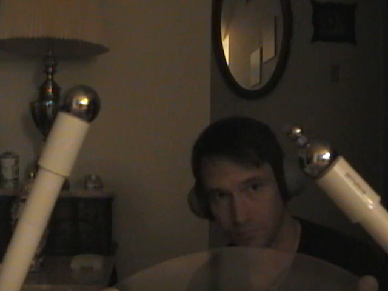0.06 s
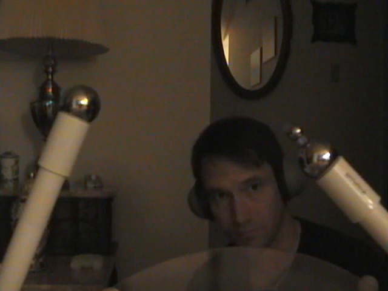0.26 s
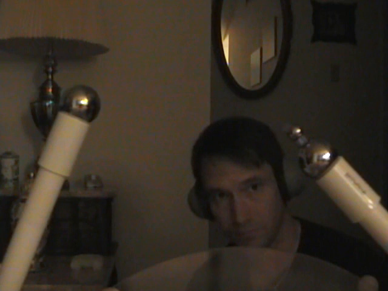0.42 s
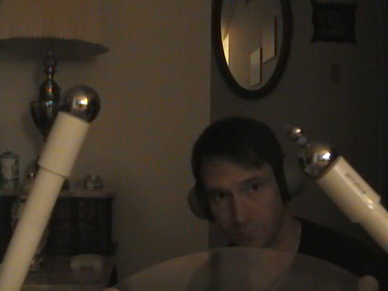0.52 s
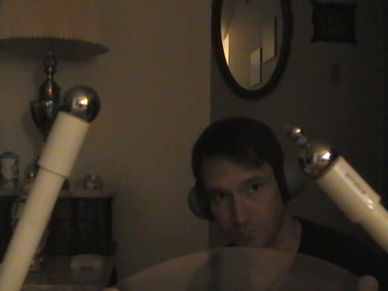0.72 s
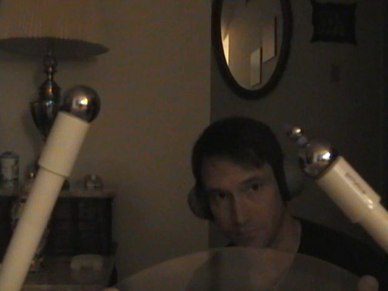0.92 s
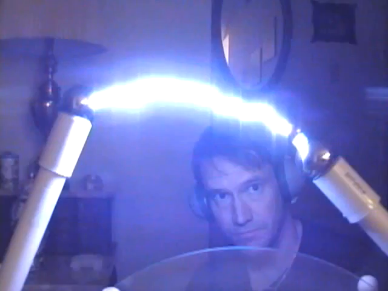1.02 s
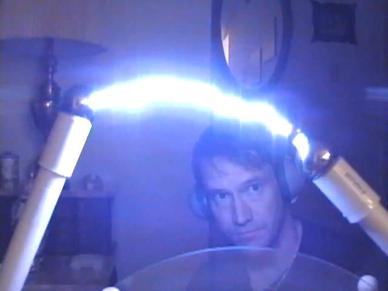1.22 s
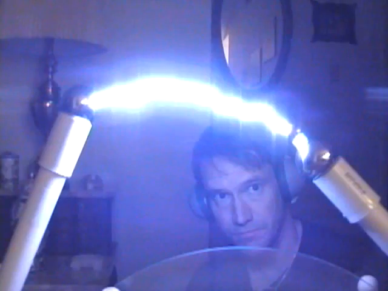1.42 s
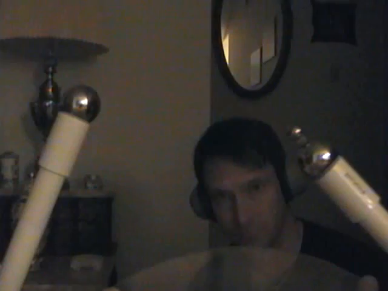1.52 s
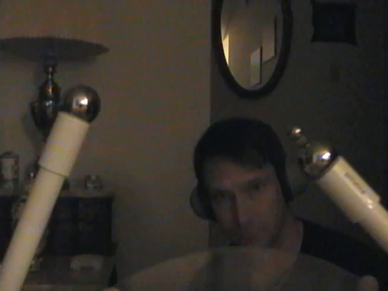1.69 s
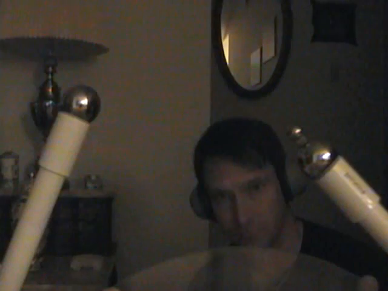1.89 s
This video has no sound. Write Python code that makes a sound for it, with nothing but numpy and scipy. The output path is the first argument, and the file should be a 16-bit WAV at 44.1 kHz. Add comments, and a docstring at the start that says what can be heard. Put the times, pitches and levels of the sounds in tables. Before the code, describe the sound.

A high-voltage spark jumps between electrodes with one very loud, sharp crack that overloads the microphone. Before it come electric sizzling and small snaps over a faint machine hum; afterwards the sizzle fades and softly returns in the small room.

```python
"""A steady hum and a fine sizzle fill a small room: a high-voltage generator is running, and corona
ionises the air at its electrodes in tiny pressure pulses, with sharper snaps and spits among them.
Then the gap breaks down. A long spark heats its channel, and one very loud crack overloads the
microphone and reverberates. The gain control ducks and slowly recovers, while the sizzle flares,
dies down and begins to build again."""
import sys
import numpy as np
from scipy import signal
from scipy.fft import rfft, irfft, next_fast_len
from scipy.io import wavfile
from scipy.ndimage import uniform_filter1d, map_coordinates

SR = 44100
rng = np.random.default_rng(int(sys.argv[2]) if len(sys.argv) > 2 else 0)


def output_pcm(signal):
    """Save a mono or channel-first signal as 16-bit PCM at the path in sys.argv[1].

    Samples are clipped to [-1, 1] before scaling.
    """
    pcm = np.clip(np.atleast_2d(signal).T, -1, 1) * 32767
    wavfile.write(sys.argv[1], SR, np.round(pcm).astype(np.int16))


N = 85995
T = np.arange(N) / SR

# Reverberation time of the room: frequency_hz, t60_s
ROOM_DECAY = [(60, 0.33), (250, 0.26), (600, 0.29), (1500, 0.37), (4000, 0.4), (7500, 0.39), (11000, 0.27),
              (15000, 0.25)]
# Left-right coherence of room sound, the crack and its tail: frequency_hz, coherence
ROOM_COHERENCE = [(40, .7), (250, 0.82), (700, 0.93), (2200, 1), (4400, 0.99), (8000, 0.3), (14000, 0.3)]
CRACK_COHERENCE = [(700, -.1), (1300, .25), (2400, .55), (4400, .7), (8000, .6), (15000, .25)]
TAIL_COHERENCE = [(100, 0), (380, .4), (700, .8), (2400, .82), (4400, .6), (8000, .52), (14000, .25)]
# Imbalance of the microphone ports: frequency_hz, left_minus_right_db
PORT_BALANCE = [(4500, -0.4), (8000, 1), (15000, 2)]
# Tones of the motor: pitch_hz, rms_level_db
HUM_TONES = [(113, -56), (231, -62.5), (371, -61.5), (856, -50.5), (1728, -66), (2632, -90)]
# Spectra of the drive, one discharge and the crack: frequency_hz, relative_density_db
WHIRR_SPECTRUM = [(25, -40), (60, -6), (100, 5.5), (155, -4), (220, 2.5), (300, -10.5), (400, -3),
                  (650, -12), (1500, -13), (3000, -53), (8000, -4.5), (15000, -15)]
DISCHARGE_SPECTRUM = [(30, -73), (150, -10), (400, -2), (1000, -2), (2000, 0.5), (3000, -2), (4500, 0.5),
                      (6500, -2), (9500, -1), (12000, -7), (15000, -22)]
CRACK_SPECTRUM = [(30, -27), (100, -22), (200, -11.5), (500, -4), (1000, -2), (2000, -1.5), (4500, 1),
                  (7000, 2), (10000, 1), (13000, -5.5), (15500, -32)]
# Envelopes of the rumble, the drive's resonance and the corona: time_s, level_db
RUMBLE_ENVELOPE = [(0, -53), (.08, -56), (.28, -51), (.4, -54.5), (1.95, -62)]
RING_ENVELOPE = [(0, -46), (.22, -43), (.3, -39.5), (.38, -44), (.72, -41.5), (1.15, -51.5), (1.5, -48),
                 (1.66, -47), (1.75, -58), (1.81, -46), (1.95, -53)]
CORONA_ENVELOPE = [(0, -27.5), (.15, -27.5), (.29, -26), (.42, -26.5), (.52, -25.5), (.59, -27),
                   (.72, -24.5), (.76, -26.5), (.79, -11), (1.15, -37), (1.5, -39), (1.95, -36.5)]
# Spitting bursts: start_s, level_db
SPIT_EVENTS = [(.0565, -22), (.2115, -18.5), (.4715, -24), (.524, -25), (.628, -19.5), (1.2368, -26.5),
               (1.2838, -25.5), (1.4278, -24), (1.563, -33), (1.6185, -29), (1.6615, -27.5), (1.802, -23)]
# Snaps, crowding just before the spark: start_s, level_db
SNAP_EVENTS = [(.0574, -10), (.2143, -8), (.2753, -11), (.3826, -.5), (.4717, -10), (.5076, -8),
               (.5132, -8), (.5246, 0), (.5266, -7), (.5339, -9), (.7208, -9), (.7489, -2), (.7494, -5),
               (.7515, -4), (.7536, -7), (.7542, -6), (.7555, -6), (.7576, -6)]
# Weaker pulses around each snap, reflections off electrodes and stands that thicken it: offset_s,
# relative_level_db
SNAP_REFLECTIONS = [(.00018, -8), (.00048, -6), (.0009, -11), (.0014, -13)]
# Wall echoes of the crack: delay_s, level_db
WALL_ECHOES = [(.0105, 9), (.0168, 14), (.051, 7), (.1198, 6), (.1303, 8)]
# Low tones under the crack: pitch_hz, level_db
THUMP_TONES = [(76, 10), (228, 9), (370, 4.5)]

SPARK_S = .7587


def amp(db):
    """Amplitude ratio: tenfold for every 20 dB."""
    return 10 ** (np.asarray(db) / 20)


def unit(x):
    """Normalisation to an rms of 1."""
    return x / np.sqrt(np.mean(x ** 2) + 1e-20)


def along(points, hz):
    """Interpolation on a logarithmic frequency axis."""
    frequencies, values = np.transpose(points)
    return np.interp(np.log(hz + 1), np.log(frequencies + 1), values)


def colour(points):
    """Magnitude response through points of frequency_hz, level_db."""
    return lambda hz: amp(along(points, hz))


def resonance(centre_hz, width_hz):
    """Lorentzian response: the gain halves at width_hz either side of the peak."""
    return lambda hz: 1 / (1 + ((hz - centre_hz) / width_hz) ** 2)


def envelope(points):
    """Amplitude envelope, linear in decibels between points of time_s, level_db."""
    return amp(np.interp(T, *np.transpose(points)))


def burst(start_s, hold_s, t60_s):
    """Exponential decay after a sudden attack and a hold."""
    return (T >= start_s) * np.exp(-np.log(1000) * np.maximum(T - start_s - hold_s, 0) / t60_s)


def wobble(rate_hz):
    """Slow random modulation: a spline through Gaussian values."""
    return map_coordinates(rng.standard_normal(int(N * rate_hz / SR) + 4), [T * rate_hz])


def filtered(x, response):
    """Linear filtering: the spectrum is multiplied by a frequency response."""
    size = next_fast_len(N + SR // 2)
    hz = np.fft.rfftfreq(size, 1 / SR)
    return irfft(rfft(x, size) * response(hz), size)[..., :N]


def noise(gain, coherence=ROOM_COHERENCE):
    """Diffuse stereo noise of rms 1: the ratio of mid to side sets the coherence."""
    def mid_side_gain(hz):
        angle = np.arccos(np.clip(along(coherence, hz), -1, 1)) / 2
        return gain(hz) * np.array([np.cos(angle), np.sin(angle)])
    mid, side = filtered(rng.standard_normal((2, N)), mid_side_gain)
    return unit(np.array([mid + side, mid - side]))


def absorbed(x):
    """Absorption: each frequency decays with its own reverberation time."""
    hz, time_s, spectra = signal.stft(x, SR, nperseg=256)
    decay = np.exp(-np.log(1000) * time_s / along(ROOM_DECAY, hz)[:, None])
    return signal.istft(spectra * decay, SR, nperseg=256)[1][:, :N]


def in_room(x, room_db):
    """Reverberation: direct sound plus its convolution with a diffuse tail."""
    tail = absorbed(noise(np.ones_like)) * (T > .002)
    tail /= np.linalg.norm(tail[0])
    return x + amp(room_db) * signal.fftconvolve(np.atleast_2d(x), tail, axes=1)[:, :N]


def rumble():
    """Narrow-band noise at low frequency is heard as a faint rumble, strongest early on."""
    return envelope(RUMBLE_ENVELOPE) * noise(resonance(centre_hz=59.4, width_hz=18))


def drive(whirr_db=-42, flutter_db=3):
    """The drive radiates a broadband whirr and one resonance that flutters in amplitude."""
    flutter = amp(flutter_db * wobble(rate_hz=15.7))
    ring = envelope(RING_ENVELOPE) * flutter * noise(resonance(centre_hz=1100, width_hz=70))
    return amp(whirr_db) * noise(colour(WHIRR_SPECTRUM)) + ring


def motor_hum(swing_db=3.5, waver_rad=.8):
    """Amplitude and phase modulation make the motor's tones slightly unsteady."""
    hum = np.zeros(N)
    for hz, db in HUM_TONES:
        peak = np.sqrt(2) * amp(db + swing_db * wobble(rate_hz=8.38))
        hum += peak * np.sin(2 * np.pi * hz * T + waver_rad * wobble(rate_hz=9))
    return hum


def discharges(impulses, gain, skew_rad=1.1):
    """Impulse response of a discharge: a unit impulse gives a pressure dip, then a spike of height 1."""
    response = lambda hz: gain(hz) * np.exp(-1j * skew_rad)
    peak = filtered(signal.unit_impulse(N, 'mid'), response).max()
    return filtered(impulses, response) / peak


def corona(rate_per_s=2200, scatter_db=3):
    """Shot noise of tiny discharges; it flares at the spark, then fades with the drained charge."""
    fires = rng.random(N) < rate_per_s / SR
    strength = amp(scatter_db * np.minimum(rng.standard_normal(N), 2.2))
    pulses = discharges(fires * strength, colour(DISCHARGE_SPECTRUM))
    return unit(in_room(pulses, room_db=-4.5)) * envelope(CORONA_ENVELOPE)


def spits():
    """Discharges in a brief cluster fuse into one decaying burst of noise."""
    bursts = sum(amp(db) * burst(start_s, hold_s=.0015, t60_s=.03) for start_s, db in SPIT_EVENTS)
    return in_room(bursts * noise(colour(DISCHARGE_SPECTRUM)), room_db=-2)


def snaps(main_offset_s=.00099, bright_hz=9000):
    """Single streamers give stronger, brighter pulses, thickened by weaker reflections off electrodes and
    stands."""
    impulses = np.zeros(N)
    for start_s, db in SNAP_EVENTS:
        for offset_s, relative_db in [(main_offset_s, 0)] + SNAP_REFLECTIONS:
            impulses[round((start_s + offset_s) * SR)] += amp(db + relative_db)
    brightened = lambda hz: colour(DISCHARGE_SPECTRUM)(hz) * (1 + (hz / bright_hz) ** 2)
    return in_room(discharges(impulses, brightened), room_db=-9)


def thump():
    """Damped low tones under the crack, in phase quadrature between left and right."""
    quadrature = np.array([[0], [np.pi / 2]])
    tones = sum(amp(db) * np.sin(2 * np.pi * (hz * T + rng.random()) + quadrature)
                for hz, db in THUMP_TONES)
    return tones * burst(SPARK_S, hold_s=.017, t60_s=.026)


def spark(leader_db=-15.5, leader_rise_s=.004, blast_db=25, tail_db=19.5):
    """Dielectric breakdown: a leader grows, the whole channel radiates a crack, and the room answers."""
    leader = amp(leader_db) * np.exp(-np.abs(T - SPARK_S) / leader_rise_s) * (T < SPARK_S)
    blast = amp(blast_db) * burst(SPARK_S, hold_s=.0042, t60_s=.017)
    echoes = sum(amp(db) * burst(SPARK_S + delay_s, hold_s=.0007, t60_s=.004)
                 for delay_s, db in WALL_ECHOES)
    crack = (leader + blast + echoes) * noise(colour(CRACK_SPECTRUM), CRACK_COHERENCE) + thump()
    tail = absorbed(noise(colour(CRACK_SPECTRUM), TAIL_COHERENCE))
    delayed_tail = np.pad(tail, ((0, 0), (round(SPARK_S * SR), 0)))[:, :N]
    return crack + amp(tail_db) * delayed_tail


def scene():
    """Superposition of all sources at two microphone ports of slightly unequal response."""
    pressure = corona() + snaps() + spits() + spark() + motor_hum() + drive() + rumble()
    port_share = np.array([[.5], [-.5]])
    return filtered(pressure, lambda hz: amp(along(PORT_BALANCE, hz) * port_share))


def record(dry, window_s=.001, attack_s=.00067, release_db_per_s=31.5, ceiling=.85, top_hz=15500):
    """Automatic gain control with fast attack and slow release, then clipping and a band limit."""
    power = uniform_filter1d(np.mean(dry ** 2, axis=0), int(window_s * SR))
    excess_db = np.maximum(10 * np.log10(np.abs(power) + 1e-12), 0)  # above full scale
    release_db = release_db_per_s * T
    held_db = np.maximum.accumulate(excess_db + release_db) - release_db
    pole = np.exp(-1 / (attack_s * SR))
    reduction_db = signal.lfilter([1 - pole], [1, -pole], held_db)
    clipped = np.clip(dry * amp(-reduction_db), -ceiling, ceiling)
    return filtered(clipped, lambda hz: np.clip((top_hz - hz) / 1200, 0, 1))


dry = scene()
out = record(dry)
output_pcm(out)
```